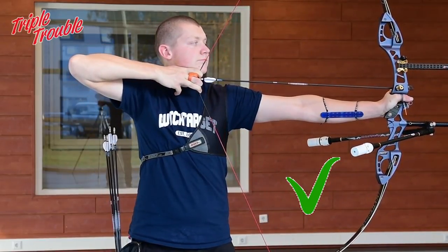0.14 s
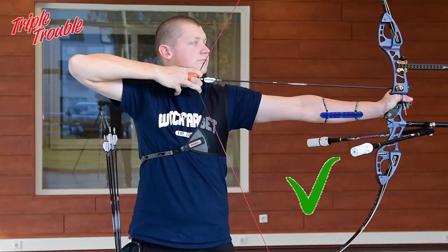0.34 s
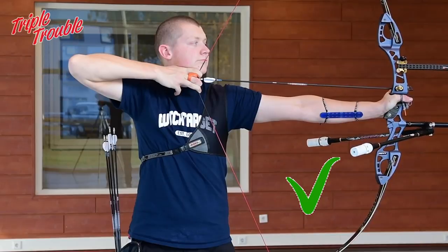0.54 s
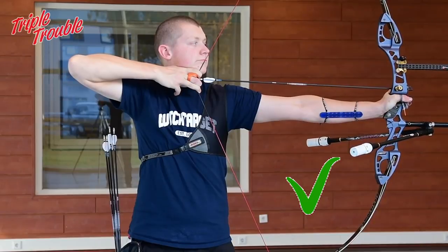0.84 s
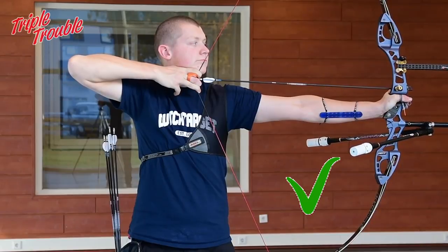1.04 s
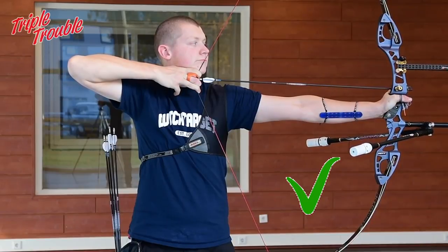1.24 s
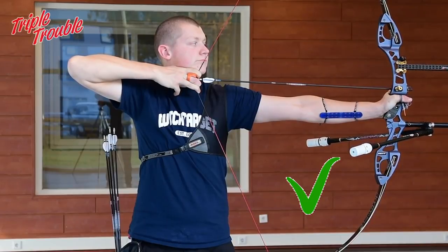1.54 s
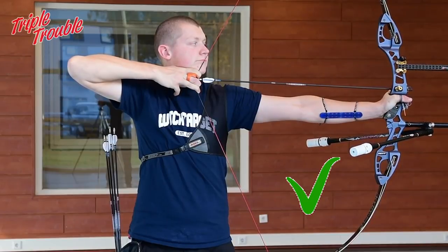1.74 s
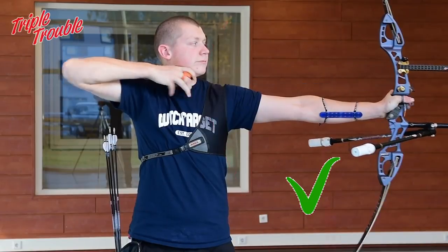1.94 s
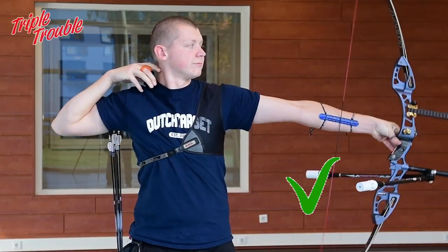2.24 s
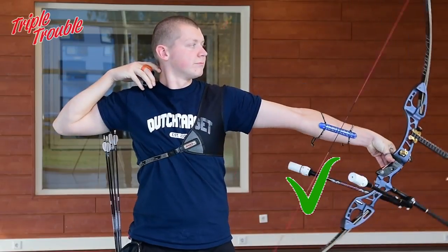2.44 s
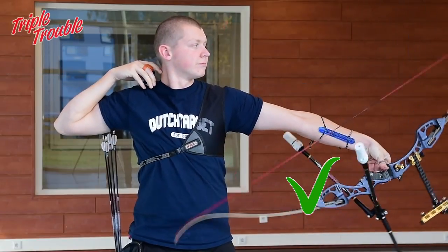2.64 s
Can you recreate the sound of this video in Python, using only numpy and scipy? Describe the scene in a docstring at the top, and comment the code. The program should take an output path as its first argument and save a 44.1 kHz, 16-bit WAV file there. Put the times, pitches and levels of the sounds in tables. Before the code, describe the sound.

A bow shot in a large hall: metallic click, ringing string slam, then a dull thud.

```python
"""A large, echoing hall with humming ventilation; one microphone, close to a recurve bow.
The drawn bow creaks faintly, then the steel clicker snaps off the arrow point. The arrow squeaks past
the rest, the string slams home and the bow rings and rattles. A dull thud follows, and the hall rings
on as the bow swings down."""
import sys
import numpy as np
from scipy import signal
from scipy.fft import rfft, irfft, next_fast_len
from scipy.io import wavfile
from scipy.ndimage import uniform_filter1d, minimum_filter1d, map_coordinates

SR = 44100
rng = np.random.default_rng(int(sys.argv[2]) if len(sys.argv) > 2 else 0)


def persist_wave(psi):
    """Save psi, clipped to +-1, as 16-bit WAV."""
    counts = np.round(np.clip(psi, -1, 1) * 32767).astype(np.int16)
    wavfile.write(sys.argv[1], SR, np.atleast_2d(counts).T)


N = 123479


def amp(db):
    """Decibels to gain."""
    return 10 ** (np.asarray(db) / 20)


def along(points, hz):
    """Read a curve of (freq_hz, value) points on a log frequency axis."""
    freqs, values = np.transpose(points)
    return np.interp(np.log(hz + 1), np.log(freqs + 1), values)


def since(start_s):
    """Seconds since start_s, zero before it."""
    return np.maximum(np.arange(N) / SR - start_s, 0)


def blow(start_s, t60, rise_s=0.00014):
    """Envelope of an impact: a quick rise, then a fall of 60 dB in t60 seconds."""
    t = since(start_s)
    return (1 - np.exp(-t / rise_s)) * np.exp(-np.log(1000) * t / t60)


def noise(spectrum):
    """Noise of rms 1; the spectrum sets only its colour."""
    size = next_fast_len(N)
    colour = amp(along(spectrum, np.fft.rfftfreq(size, 1 / SR)))
    x = irfft(rfft(rng.standard_normal(size)) * colour, size)[:N]
    return x / x.std()


def ring(start_s, hz, t60):
    """One struck mode, at a random phase."""
    return blow(start_s, t60) * np.sin(2 * np.pi * (hz * since(start_s) + rng.random()))


def wobble(per_s):
    """A smooth random curve with per_s knots a second."""
    return map_coordinates(rng.standard_normal(int(N * per_s / SR) + 4), [since(0) * per_s])


# The hall's reverberation time: freq_hz, t60_s
HALL_DECAY = [(100, 1.7), (250, 1.66), (400, 2.58), (570, 2.57), (720, 1.86), (1100, 1.32), (2000, 1.7),
              (3500, 1.755), (5500, 1.44), (8000, 1), (11000, 0.86), (15500, 0.54)]

def hall(x, paths=5, slice_s=0.016, delay_s=0.0061, build_s=0.01, low_cut_hz=79):
    """Diffuse echo; successive moments of a sound take different paths, and the treble dies first."""
    hz, t, spectra = signal.stft(rng.standard_normal((paths, SR + SR // 4)), SR, nperseg=256)
    decay = np.exp(-np.log(1000) * t / along(HALL_DECAY, hz)[:, None])
    tails = signal.istft(spectra * decay, SR, nperseg=256)[1]
    tails *= 1 - np.exp(-since(delay_s)[:tails.shape[1]] / build_s)
    tails /= np.linalg.norm(tails[0])
    turn = (since(0) / slice_s - np.arange(paths)[:, None]) % paths
    slices = x * np.sin(np.pi / 2 * np.minimum(turn, 2))  # crossfade from path to path
    echo = signal.fftconvolve(slices, tails, axes=1).sum(axis=0)[:N]
    low_cut = signal.butter(4, low_cut_hz, "high", fs=SR, output="sos")
    return signal.sosfilt(low_cut, echo) / np.sqrt(2)


# Room tone at the microphone: freq_hz, level_db
VENTILATION_COLOUR = [(15, -54), (25, -19.5), (55, -2), (101, -1), (136, -7.5), (204, -6), (233, -2),
                      (260, -11.5), (340, -10), (399, -15), (523, -21.5), (614, -17.5), (945, -26),
                      (1110, -27.5), (3000, -39), (3830, -38.5), (15500, -46.5)]

def ventilation(level_db=-44.5):
    """Moving air fills the hall with a steady low hum."""
    return amp(level_db) * noise(VENTILATION_COLOUR)


# Faint creaks at full draw, close and dry: start_s, level_db, pitch_hz
CREAKS = [(0.792, -52.5, 4050), (1.4804, -49.5, 3200)]
# Their grit: freq_hz, level_db
CREAK_COLOUR = [(300, -3), (1500, 2), (4000, -6), (5500, -18), (12000, -33)]

def creaks(t60=0.027):
    """The drawn bow gives small pitched ticks."""
    grit = noise(CREAK_COLOUR)
    return sum(amp(db) * (grit * blow(s, t60) + amp(-3) * ring(s, hz, t60)) for s, db, hz in CREAKS)


# Fittings touch during the shot and as the bow swings down: start_s, level_db
RATTLE_HITS = [(1.9938, -26), (1.996, -27), (2.004, -21), (2.0118, -16), (2.017, -16), (2.0208, -32),
               (2.0255, -21), (2.047, -36), (2.102, -21.5), (2.12, -21), (2.129, -18.5), (2.420, -43),
               (2.4425, -42), (2.4835, -38)]
# One contact, heard close: freq_hz, level_db
TICK_COLOUR = [(2000, -31), (8000, -2), (12000, -2), (15500, -7)]

def rattle(t60=0.012, hall_db=-9):
    """Tiny bright contacts between the bow's loose fittings."""
    ticks = noise(TICK_COLOUR) * sum(amp(db) * blow(s, t60) for s, db in RATTLE_HITS)
    return ticks + amp(hall_db) * hall(ticks)


# The limbs stop, then the arrow lands: start_s, pitch_hz, level_db, t60_s, hall_send_db
THUDS = [(2.0036, 216.5, -11.5, 0.079, -1.5), (2.105, 120.6, -11, 0.076, 0)]

def thuds():
    """Heavily damped low knocks that make the hall boom."""
    near = far = np.zeros(N)
    for s, hz, db, t60, hall_db in THUDS:
        knock = amp(db) * blow(s, t60, rise_s=0.0013) * np.sin(2 * np.pi * hz * since(s))
        near, far = near + knock, far + amp(hall_db) * knock
    return near + hall(far)


# Course of the shaft's squeak on the rest: time_s, pitch_hz, level_db
SQUEAK_PATH = [(1.994, 2504, -31), (1.997, 2760, -15), (2.0005, 3335, -16.5), (2.002, 4430, -9.5),
               (2.005, 3950, -15.5), (2.010, 4540, -17), (2.016, 4250, -57)]
# The scrape under it: freq_hz, level_db
SCRAPE_COLOUR = [(100, -20), (500, -6), (1300, -2.5), (3200, -10), (5500, -14), (9000, -10), (15000, -34)]

def arrow(slips_per_s=1100, pitch_jitter=0.05, flutter_db=2.5):
    """The shaft sticks and slips over the wire rest, flicking it; the squeak rises as it speeds up."""
    times, hz, db = np.transpose(SQUEAK_PATH)
    t = since(0)
    pitch_hz = np.interp(t, times, hz) * (1 + pitch_jitter * wobble(slips_per_s))
    level_db = np.interp(t, times, db, left=-120, right=-120) + flutter_db * wobble(slips_per_s)
    squeak = amp(level_db) * np.sin(2 * np.pi * np.cumsum(pitch_hz) / SR)
    scrape = amp(-14.5) * noise(SCRAPE_COLOUR) * blow(start_s=1.9905, t60=0.071, rise_s=0.0086)
    wire_rest = amp(-15.5) * ring(start_s=1.9928, hz=8160, t60=0.017)
    return squeak + scrape + wire_rest + hall(amp(-5.5) * squeak + amp(-6) * scrape)


# The clicker's blade meets the riser: start_s, ring_db, snap_db
CLICKER_HITS = [(1.8309, -31, -15), (1.8351, -31.5, -46), (1.8406, -36.5, -25)]
# The steel blade's modes: pitch_hz, relative_db, t60_s, hall_send_db
BLADE_MODES = [(1940, 1.5, 0.032, -14), (2005, -9.5, 0.066, 2.5), (2753, -6, 0.032, -7),
               (2870, -14, .06, 5.5), (3260, -22, 0.073, 7), (3960, -14, 0.023, 3.5),
               (4720, -17, 0.064, -3), (5260, -8, 0.018, 1), (5730, -10.5, 0.021, 10),
               (6240, -18, 0.022, 13), (7850, -7, 0.035, 2.5), (8260, -2.5, 0.025, -1),
               (12400, -8, 0.018, 1)]
# The snap straight to the microphone: freq_hz, level_db
SNAP_NEAR = [(300, -34), (1150, -8.5), (2400, -1), (5000, -6.5), (10000, -15.5), (13000, 1), (15500, 1)]
# The snap as the hall receives it: freq_hz, level_db
SNAP_FAR = [(300, -20), (1250, -1), (2400, 4), (5000, 2.5), (10000, -5.5), (13000, -6), (15500, -4.5)]

def clicker(wander_cycles=0.1):
    """The blade snaps against the riser and bounces; it chatters there, so its ring is rough."""
    snaps = sum(amp(snap_db) * blow(s, t60=0.0089) for s, _, snap_db in CLICKER_HITS)
    near = noise(SNAP_NEAR) * snaps
    far = amp(-4) * noise(SNAP_FAR) * snaps
    for hz, db, t60, hall_db in BLADE_MODES:
        cycles = hz * since(0) + wander_cycles * wobble(per_s=300) + rng.random()
        envelope = sum(amp(ring_db) * blow(s, t60) for s, ring_db, _ in CLICKER_HITS)
        mode = amp(db) * np.sin(2 * np.pi * cycles) * envelope
        near, far = near + mode, far + amp(hall_db) * mode
    return near + hall(far)


# The string's slam, close to the microphone: freq_hz, level_db
SLAM_COLOUR = [(40, -32), (80, -20), (120, -1.5), (240, 2.5), (320, 3), (450, 3.5), (600, 1), (700, -2),
               (1100, -3.5), (1500, -5), (2900, -3.5), (4700, -5), (6500, -12), (8500, -14), (11000, -22.5),
               (15500, -24)]
# The crack just after it: freq_hz, level_db
CRACK_COLOUR = [(200, -20), (500, 0), (1100, -2), (2600, 11.5), (4500, -2), (6500, -23), (13000, -22),
                (15500, -20)]
# Modes of the limbs, riser and stabilisers: pitch_hz, relative_db, t60_s
BOW_MODES = [(189.4, -5, 0.16), (233, -12.5, 0.15), (341.4, 1, 0.32), (451.8, -5, 0.56), (559.6, -3.5, 1.6),
             (576.4, -4, 1.56), (881.6, -6.5, 0.82), (1092, 3, 0.14), (1204, -1, 0.38), (1936, -3.5, 0.53),
             (2310, -12, 0.14), (2560, -4, 0.16), (3090, 0, 0.27), (3310, -1, .25), (3710, -2, .25)]

def bow(slam_s=2.005, crack_s=2.011):
    """The string slams home: a dense clatter, a hard crack and the ringing of the bow's parts."""
    slam = amp(-14.5) * noise(SLAM_COLOUR) * blow(slam_s, t60=0.26, rise_s=0.003)
    crack = amp(-15.5) * noise(CRACK_COLOUR) * blow(crack_s, t60=0.36, rise_s=0.0015)
    modes = amp(-24.5) * sum(amp(db) * ring(slam_s, hz, t60) for hz, db, t60 in BOW_MODES)
    return slam + crack + modes + hall(amp(9.5) * slam + amp(-1.5) * modes)


def scene():
    """One shot over the hall's ventilation, in mono from beside the bow."""
    return (creaks() + clicker() + arrow() + bow() + thuds() + rattle() + ventilation())[None]


def record(dry):
    """Behind the microphone, a limiter holds down the peaks and the highest treble is cut off."""
    ceiling, hold_s, top_hz = 0.46, 0.0036, 15800
    hold = int(hold_s * SR)
    needed_gain = ceiling / np.maximum(np.abs(dry), ceiling)
    gain = uniform_filter1d(minimum_filter1d(needed_gain, hold), hold)
    size = next_fast_len(N + SR // 2)
    passband = np.fft.rfftfreq(size, 1 / SR) < top_hz
    return irfft(rfft(dry * gain, size) * passband, size)[..., :N]


dry = scene()
out = record(dry)
persist_wave(out)
```